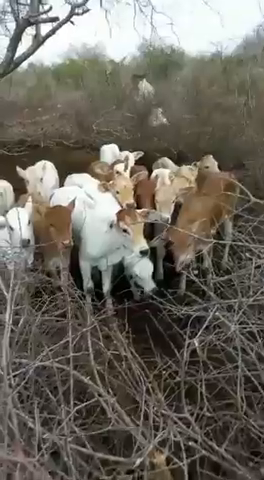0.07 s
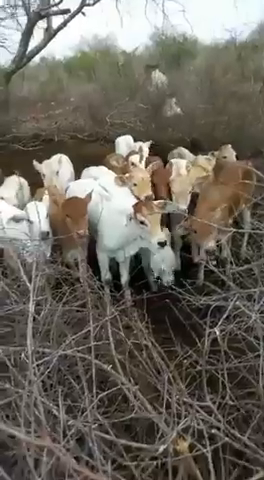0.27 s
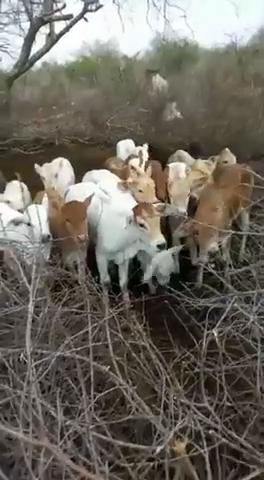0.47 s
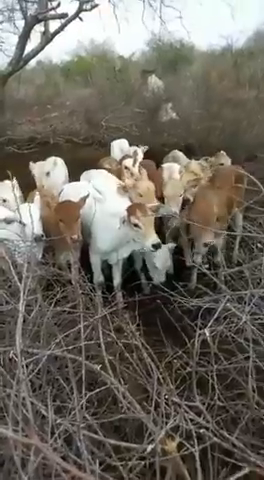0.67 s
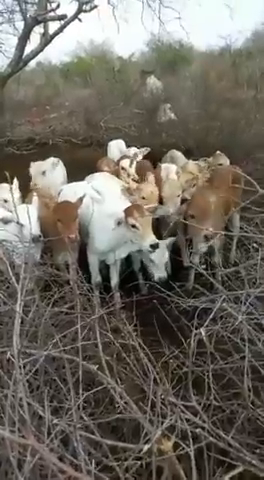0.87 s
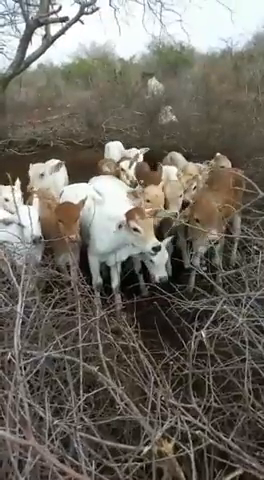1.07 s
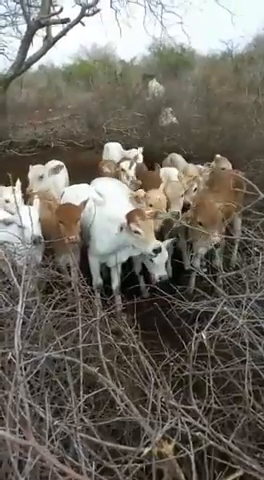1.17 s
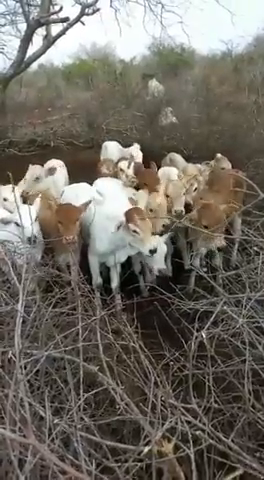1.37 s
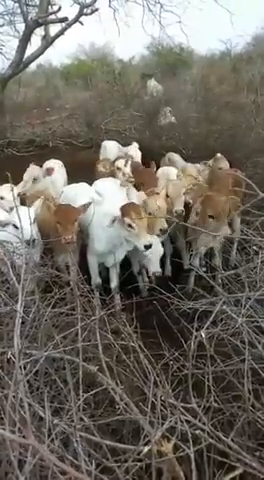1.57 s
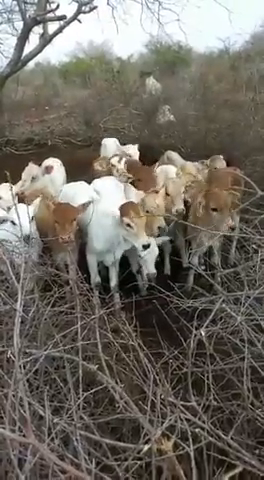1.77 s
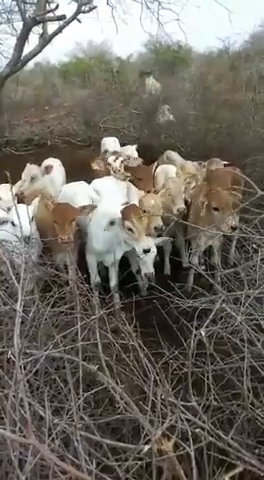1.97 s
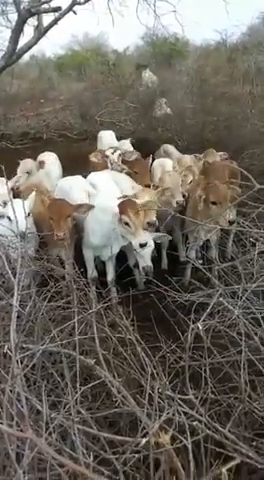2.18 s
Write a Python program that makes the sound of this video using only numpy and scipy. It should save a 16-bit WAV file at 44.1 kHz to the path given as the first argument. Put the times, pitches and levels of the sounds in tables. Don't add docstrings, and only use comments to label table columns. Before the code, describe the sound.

Outdoors in a brushy enclosure, a single calf moo rises from closed-lip hum to full bawl and stops short, with slight open-yard reverberation, then sharp twig snaps, a faint insect trill and a tiny branch squeak.

```python
import sys
import numpy as np
from scipy import signal
from scipy.fft import rfft, irfft, next_fast_len
from scipy.io import wavfile
from scipy.ndimage import uniform_filter1d, map_coordinates

SR = 44100
rng = np.random.default_rng(int(sys.argv[2]) if len(sys.argv) > 2 else 0)


def volts_from_decibels(level):
    exponent = np.asarray(level, float) / 20
    return 10 ** exponent


def wav_record(signal):
    frames = np.transpose(np.atleast_2d(signal))
    bounded = np.clip(frames, -1, 1)
    quanta = np.round(bounded * 32767).astype(np.int16)
    wavfile.write(sys.argv[1], SR, quanta)


N = 98298
T = np.arange(N) / SR


def unit(x):
    return x / np.sqrt(np.mean(x ** 2) + 1e-20)


def curves(rows):
    s, *cols = np.transpose(rows)
    return [np.interp(T, s, c) for c in cols]


def wobble(rate):
    return map_coordinates(rng.standard_normal(int(N * rate / SR) + 4), [T * rate])


def tone(hz):
    return np.sin(2 * np.pi * np.cumsum(hz) / SR)


def filtered(x, response):
    m = 2 * next_fast_len(N // 2 + SR // 4)
    return irfft(rfft(x, m) * response(np.fft.rfftfreq(m, 1 / SR)), m)[:N]


def peaks(rows):
    def response(f):
        total = 0
        for k, (centre, width, db) in enumerate(rows):
            resonance = 1j * f * width / (centre ** 2 - f * f + 1j * f * width)
            total = total + (-1) ** k * volts_from_decibels(db) * resonance
        return total
    return response


def throat(rows, shift=1, order=2, top_hz=11060):
    def response(f):
        power = 0
        for centre, width, db in rows:
            damping = (f * width) ** 2
            detuning = ((centre * shift) ** 2 - f * f) ** 2
            power = power + volts_from_decibels(2 * db) * (damping / (detuning + damping)) ** order
        power = power / (1 + (f / top_hz) ** 40)
        cepstrum = irfft(np.log(power + 1e-11) / 2)
        cepstrum[1:len(cepstrum) // 2] *= 2
        cepstrum[len(cepstrum) // 2 + 1:] = 0
        return np.exp(rfft(cepstrum))
    return response


def noise(points):
    f, db = np.transpose(points)
    colour = lambda hz: volts_from_decibels(np.interp(np.log(hz + 1), np.log(f), db, -120, -120))
    return unit(filtered(rng.standard_normal(N), colour))


def pulses(cycles, scatter_db):
    at = np.interp(np.arange(np.ceil(cycles[0]), cycles[-1]), cycles, np.arange(N))
    taps = np.floor(at)[:, None] + np.arange(-7, 9)
    gap = taps - at[:, None]
    size = volts_from_decibels(scatter_db * rng.standard_normal(400)[:len(at), None])
    clicks = size * np.sinc(gap) * np.cos(gap * np.pi / 16) ** 2
    return np.bincount(np.clip(taps, 0, N - 1).astype(int).ravel(), clicks.ravel(), N)


# f/Hz, level/dB
AIR_COLOUR = [(120, -40.5), (200, -26), (294, 1.5), (417, -5), (2840, -12), (3900, -12), (7180, -13.5),
              (8110, -25.5), (13000, -28.5)]
# f/Hz, level/dB
RUMBLE_COLOUR = [(20, -5), (50, -16), (90, 2), (170, -8.5), (260, -14), (400, -24.5)]
# f/Hz, level/dB
HISS_COLOUR = [(11500, -12), (13800, -8), (14800, -1), (15550, 5), (15600, -93)]


def air():
    breeze = volts_from_decibels(-71 + .8 * wobble(8)) * noise(AIR_COLOUR)
    rumble = volts_from_decibels(-57.5 + 2.5 * wobble(6)) * noise(RUMBLE_COLOUR)
    return breeze + rumble + volts_from_decibels(-84) * noise(HISS_COLOUR)


# f/Hz, width/Hz, level/dB
HOLLOW_MODE = [(614.5, 86, 10)]


def yard(voice):
    t60_s, delay_s, dull_hz = 0.3, 0.019, 4130
    t = T[:SR // 2]
    tail = rng.standard_normal(len(t)) * volts_from_decibels(-60 * t / t60_s) * (t > delay_s)
    dulled = filtered(voice, lambda f: 1 / (1 + 1j * f / dull_hz) + peaks(HOLLOW_MODE)(f))
    return volts_from_decibels(-18) * signal.fftconvolve(dulled, tail / np.linalg.norm(tail))[:N]


# f/Hz, width/Hz, level/dB
EXHAUST_MODES = [(130, 58, -3.5), (95, 77, -11)]


def engine():
    first_firing_s, firings_per_s, speedup = .101, 18.06, 2.826
    t = T - first_firing_s
    puffs = pulses(firings_per_s * t + speedup / 2 * t * t, scatter_db=.8)

    def pipe(f):
        modes = peaks(EXHAUST_MODES)(f)
        return modes ** 2 * abs(modes)
    return volts_from_decibels(-49.5) * unit(filtered(puffs, pipe))


# t/s, level/dB, f/Hz, width/Hz
HOOF_THUD = (1.638, -41.5, 100, 39)


def hoof():
    s, db, hz, width = HOOF_THUD
    blow = 1. * (np.arange(N) == int(s * SR))
    thud = filtered(blow, lambda f: peaks([(hz, width, 0)])(f) ** 2)
    return volts_from_decibels(db) * thud / abs(thud).max()


# t/s, f/Hz, level/dB
CRICKET_TONE = [(.1, 7150, -78), (.3, 7250, -74), (.42, 7540, -82.5), (1.4, 7040, -76), (1.95, 7300, -72.5),
                (2.05, 7200, -77.5), (2.065, 7040, -110)]


def cricket():
    trill_from_s, strokes_per_s, speedup = 1.452, 49.6, 5.4
    hz, level_db = curves(CRICKET_TONE)
    t = T - trill_from_s
    count = strokes_per_s * t + speedup / 2 * np.clip(t, 0, 9) ** 2
    strokes = np.cos(np.pi * count) ** 4
    return 2 * volts_from_decibels(level_db + 2 * wobble(40)) * strokes * tone(hz + 40 * wobble(200))


# t/s, f/Hz, level/dB
BRANCH_TONE = [
    (2.111, 1503, -76),
    (2.164, 1590, -57),
    (2.184, 1845, -62),
    (2.203, 2250, -55),
    (2.215, 2250, -60),
    (2.22, 2550, -59),
    (2.228, 2460, -70),
]


def squeak():
    slips_per_s, speedup, depth = 55, 800, .85
    start_s, start_hz, _ = BRANCH_TONE[0]
    hz, level_db = curves([(start_s - .008, start_hz, -110)] + list(BRANCH_TONE))
    t = T - 2.118
    count = slips_per_s * t + speedup / 2 * t * t
    slips = 1 - depth * np.sin(np.pi * count) ** 2
    return 2 * volts_from_decibels(level_db) * slips * tone(hz * (1 + .025 * wobble(120)))


# t/s, peak level/dB, f/Hz, t60/s
TWIG_SNAPS = [(1.4022, -41, 5700, 0.007), (1.4065, -31, 5200, 0.007), (1.4082, -30, 3560, 0.009),
              (1.4145, -43, 3700, 0.006), (1.416, -50, 6000, .008), (1.4, -44, 3500, .008),
              (1.4075, -32, 6600, 0.006), (1.4085, -34, 7600, .005), (1.409, -44, 11600, .004),
              (1.4075, -42, 10300, 0.005), (1.407, -42, 9000, 0.006), (1.4015, -48, 7000, .005),
              (1.402, -52, 9800, .005), (1.491, -49.5, 3070, 0.011), (1.604, -58.5, 3500, .01),
              (1.784, -60, 3270, 0.011), (1.8574, -49, 3280, .015), (1.874, -27, 3310, 0.013),
              (1.874, -36.5, 5110, 0.015), (1.874, -51.5, 2210, 0.024), (1.873, -69, 8800, 0.0036),
              (1.881, -42.5, 3100, .01), (1.891, -48.5, 5200, 0.0057), (2.065, -55, 3300, 0.018),
              (2.0696, -53.5, 4470, 0.0066), (2.0705, -54, 6520, .006), (2.081, -54, 3270, 0.0093),
              (2.09, -56, 3100, .012), (2.133, -39, 4900, 0.022), (2.132, -47, 5420, 0.021),
              (2.135, -54, 8500, 0.016)]


def snaps():
    attack_s, crack_db, crack_t60_s, rough_rad = 0.00048, -15, .006, .6
    out = np.zeros(N)
    crack = filtered(rng.standard_normal(N), lambda f: (f > 2800) / (1 + (f / 12000) ** 12))
    for s, db, hz, t60 in TWIG_SNAPS:
        t = np.clip(T - s, 0, None)
        onset = 1 - np.exp(-t / attack_s)
        ring = volts_from_decibels(4 - 60 * t / t60) * np.sin(2 * np.pi * hz * t + rough_rad * wobble(1500))
        out += volts_from_decibels(db) * onset * (ring + volts_from_decibels(crack_db - 60 * t / crack_t60_s) * crack)
    return 1.4 * filtered(out, lambda f: (1j * f / (1j * f + 1400)) ** 3)


# t/s, level/dB, t60/s
SOFT_RUSTLES = [
    (1.294, -53, 0.15),
    (1.394, -44.5, 0.097),
    (1.482, -62, 0.2),
    (1.857, -58.5, 0.29),
    (2.062, -64.5, 0.68),
    (2.135, -66, 0.17),
]
# f/Hz, level/dB
TWIG_COLOUR = [(2300, -27), (2900, -4), (3900, -3), (4500, -6), (5200, 0), (6300, -8.5), (7500, -21),
               (12000, -32.5)]


def rustle():
    trail = np.zeros(N)
    for s, db, t60 in SOFT_RUSTLES:
        trail += volts_from_decibels(db - 60 * (T - s) / t60) * np.clip((T - s) / 0.01, 0, 1)
    return trail * unit(noise(TWIG_COLOUR) * volts_from_decibels(4 * wobble(300)))


def flanks(voice):
    level_db, t60_s, from_hz = -4, .013, 2200
    t = T[:SR // 2]
    near = rng.standard_normal(len(t)) * volts_from_decibels(-60 * t / t60_s) * (t > .0015)
    near = near / np.linalg.norm(near)

    def response(f):
        highpass = (1j * f / (1j * f + from_hz)) ** 2
        scatter = 1 + volts_from_decibels(level_db) * highpass * rfft(near, 2 * len(f) - 2)
        return scatter / (abs(scatter) ** 2 + .1) ** .4
    return filtered(voice, response)


def posed(source, rows, poses, order):
    s = [p[0] for p in poses]
    out = 0
    for k, (_, shift) in enumerate(poses):
        share = np.interp(T, s, np.arange(len(s)) == k)
        pose = [r[:2] + (r[2 + k],) for r in rows]
        out = out + share * unit(filtered(source, throat(pose, shift, order=order)))
    return out


# t/s, level/dB
SNORT_LEVEL = [(.08, -67.5), (.15, -62.5), (.3, -64), (.42, -63.5), (.47, -60), (.52, -110)]
# f/Hz, width/Hz, level/dB
NOSTRIL_MODES = [(2420, 300, 0), (2980, 350, -6), (3600, 380, -2), (4600, 650, -1), (5290, 350, -3)]


def snort(breath):
    flow = breath + .5 * rng.standard_normal(N)
    return volts_from_decibels(curves(SNORT_LEVEL)[0]) * unit(filtered(flow, throat(NOSTRIL_MODES, order=3)))


# f/Hz, width/Hz, level/dB with the lips shut tight, level/dB easing
NOSE_MODES = [(481, 246, 2.5, 3.5), (805, 160, 1, -1), (1058, 300, -1, -0.5), (1248, 192, 0.5, -5.5),
              (1590, 150, -5.5, -23.5), (3610, 740, -21, -19), (4560, 1100, -22, -18.5)]
# t/s, resonance shift as a ratio
NOSE_TIMES = [
    (.19, 1),
    (.3, 1.004),
]


def nose(source):
    return posed(source, NOSE_MODES, NOSE_TIMES, order=3)


# f/Hz, width/Hz, level/dB parting, level/dB open, level/dB wide, level/dB closing
MOUTH_MODES = [(388.4, 164, -10.5, -6.5, -9.5, -4.5), (500.6, 77, 1.5, 1.5, 1.3, 3.6),
               (576, 71, -19, -36, -34, -8), (840, 235, -13, -18, -18.5, -11.5),
               (1227, 101, 1.5, -12.5, -5, -1.5), (1378, 88.3, -11.5, -8.5, -16.5, -8.5),
               (1795, 148, -22, -15, -12, -9), (2264, 213, -16, -15, -16, -10.5),
               (2659, 99, -7.5, -22, -21.5, -19), (3040, 173, -11.5, -16, -17, -19),
               (3830, 270, -15.5, -16, -16.5, -13), (4200, 188, -10.5, -11, -24, -11),
               (4823, 350, -11.5, -18, -18, -14), (5347, 160, -13, -15, -27.5, -19)]
# t/s, resonance shift as a ratio
MOUTH_TIMES = [
    (.47, 0.93),
    (.56, 0.99),
    (0.951, 1.001),
    (1.2, 1.001),
]
# f/Hz, width/Hz, level/dB
SIDE_CAVITY = [(4157, 160, 2)]
# t/s, level/dB
CAVITY_SWELL = [
    (.5, -48),
    (.525, -9),
    (.56, -8.5),
    (.6, -34.5),
    (.64, -59.5),
]
# f/Hz, width/Hz, level/dB
BUZZ_MODES = [(6200, 910, -3.5), (7200, 900, -12.5), (8460, 1100, -12.5), (10700, 1500, -16.5)]


def mouth(source, breath, pitch):
    top_hz, rasp = 5440, 0.3
    tube = filtered(source, throat([(top_hz / 2, 4 * top_hz, 0)], top_hz=top_hz))
    formants = posed(tube, MOUTH_MODES, MOUTH_TIMES, order=2)
    cavity = volts_from_decibels(curves(CAVITY_SWELL)[0]) * unit(filtered(source, throat(SIDE_CAVITY)))
    buzz_db = -31.5 + 0.66 * np.clip(pitch - 114, -30, 0)
    buzz = volts_from_decibels(buzz_db) * unit(filtered(source + rasp * breath, throat(BUZZ_MODES)))
    return formants + cavity + buzz


# t/s, f/Hz, level/dB, roughness 0-1
HUM_NOTES = [(.14, 81.1, -65.5, 0.4), (.174, 84.1, -62, .33), (.181, 85.5, -54, 0.33),
             (.238, 86.16, -51, 0.38), (.328, 88.7, -47.5, 0.33), (.386, 95, -44, .25),
             (.43, 100, -48, 0.37), (.48, 109.6, -40, 0.18)]
# t/s, f/Hz, level/dB, roughness 0-1
BAWL_NOTES = [(.525, 117.4, -31, 0.13), (.555, 120, -29.5, 0.13), (.6, 122.2, -30, 0.043),
              (.75, 123.1, -28, 0.12), (.908, 124.9, -24.5, 0.099), (1.09, 122.7, -23.5, 0.05),
              (1.16, 117.9, -25, 0.13), (1.2, 115.6, -25, 0.069), (1.23, 105.5, -24.5, 0.087)]
# t/s, f/Hz, level/dB, roughness 0-1
CREAK_NOTES = [
    (1.245, 96.76, -25.5, 0.066),
    (1.262, 87.46, -32.5, 0.1),
    (1.286, 75.16, -48.5, 0.33),
    (1.328, 67.28, -59, 0.49),
    (1.389, 64.7, -76.5, 0.59),
]
# t/s, opening 0-1
LIP_OPENING = [
    (.425, 0),
    (.455, 0.29),
    (.5, 1),
    (1.27, 0.9),
    (1.3, 0.39),
]


def calf():
    notes = [(.11, 80.44, -74, 0.11)] + list(HUM_NOTES) + list(BAWL_NOTES) + list(CREAK_NOTES)
    pitch, level_db, rough = curves(notes)
    pitch = uniform_filter1d(pitch, size=SR // 25)
    jitter = 0.0008 + .09 * rough ** 2
    cycles = np.cumsum(pitch * (1 + jitter * wobble(70))) / SR
    gated = unit(rng.standard_normal(N) * np.exp(-2.5 * (cycles % 1)))
    breath = filtered(gated, lambda f: f / (f + 2500))
    folds = unit(pulses(cycles, scatter_db=.4) / np.sqrt(pitch))
    source = folds + np.clip(rough, 0, 1) * breath
    opening = np.clip(curves(LIP_OPENING)[0], 0, 1)
    voice = (1 - opening) * nose(source) + opening * mouth(source, breath, pitch)
    waver_db = 5.5 * rough * wobble(29.67)
    return -volts_from_decibels(level_db + waver_db) * voice + snort(breath)


def scene():
    background = air() + engine() + hoof() + cricket() + squeak() + snaps() + rustle()
    voice = flanks(calf())
    return (background + yard(voice) + voice)[None]


def roll_off(x):
    return signal.sosfilt(signal.butter(12, 15690, fs=SR, output="sos"), x)


def record(dry):
    start_s, fade_s, fade_db = 0.084, 0.2, -10.5
    fade = volts_from_decibels(fade_db * np.clip(1 - (T - start_s) / fade_s, 0, 1)) * (T > start_s)
    return roll_off(dry * fade)


dry = scene()
out = record(dry)
wav_record(out)
```